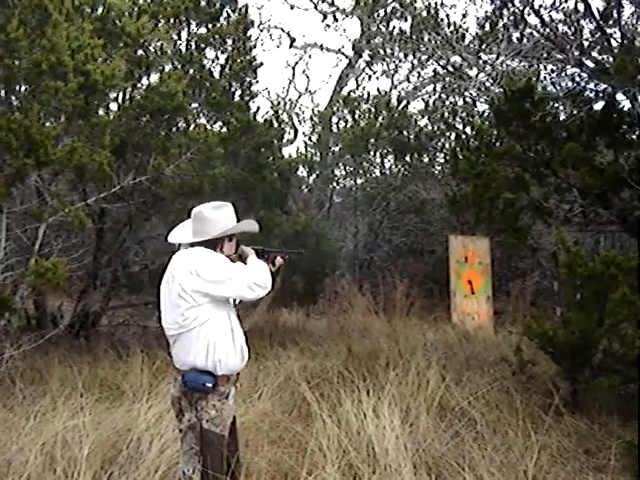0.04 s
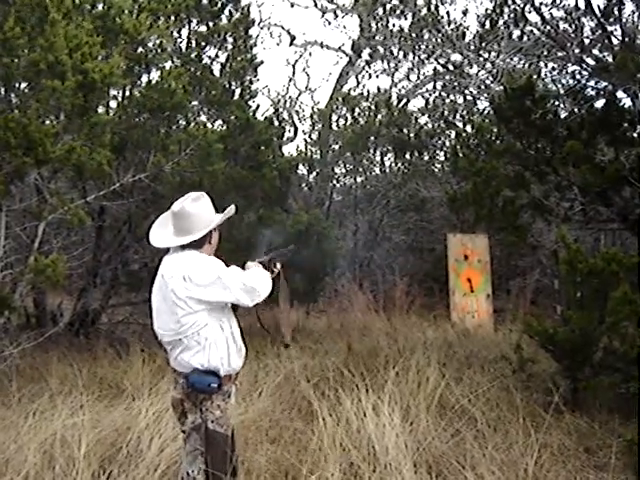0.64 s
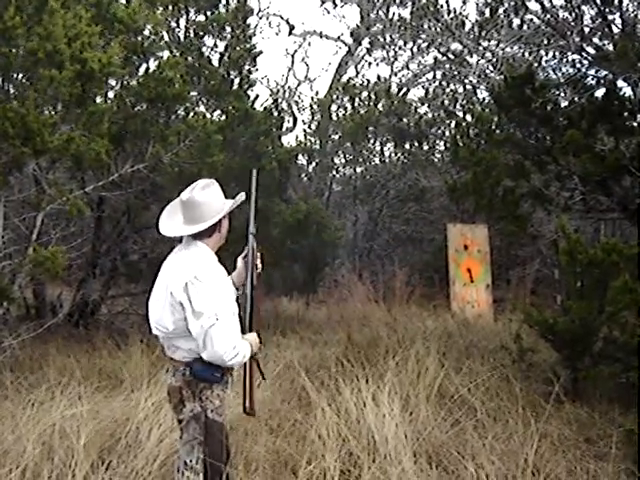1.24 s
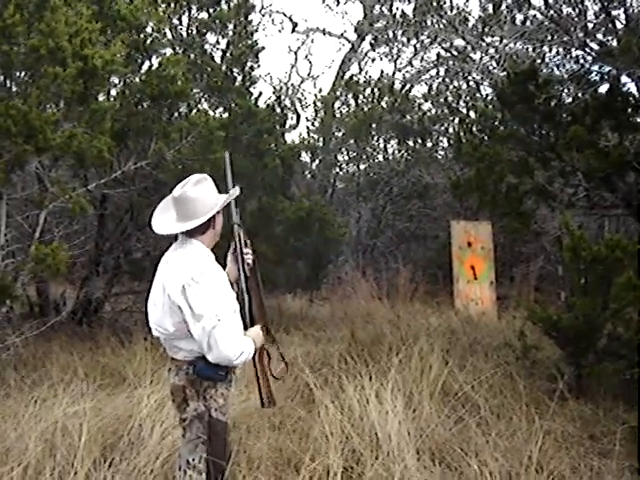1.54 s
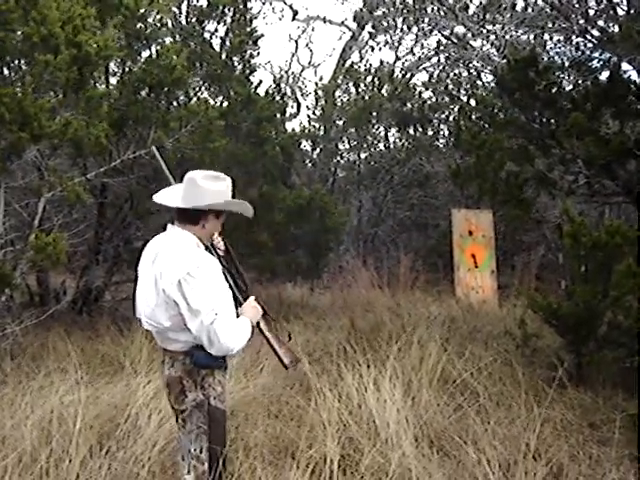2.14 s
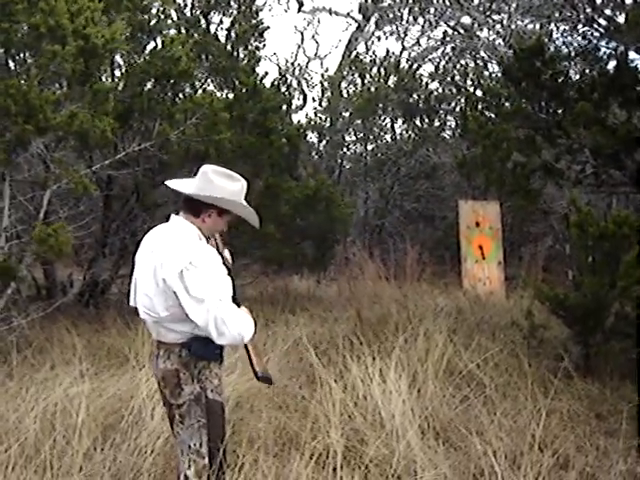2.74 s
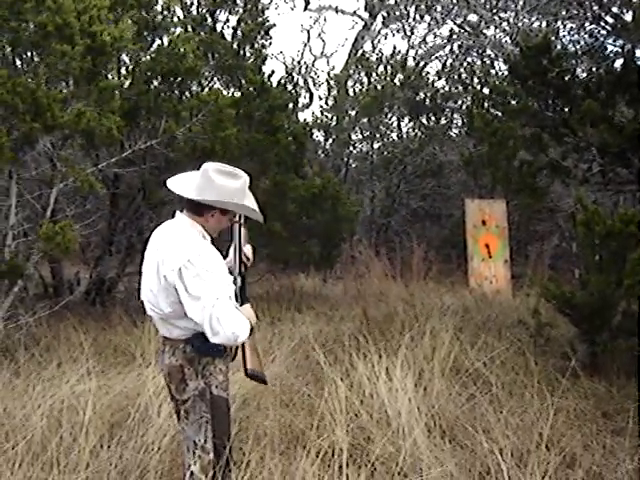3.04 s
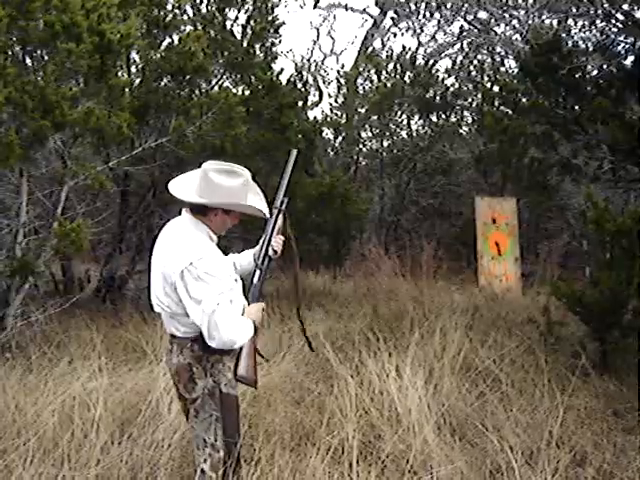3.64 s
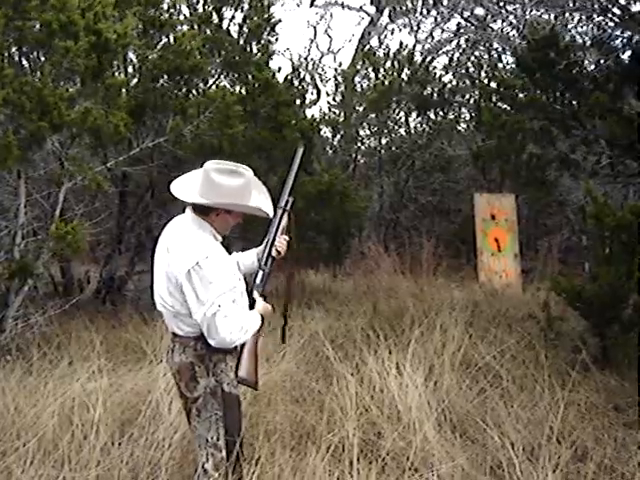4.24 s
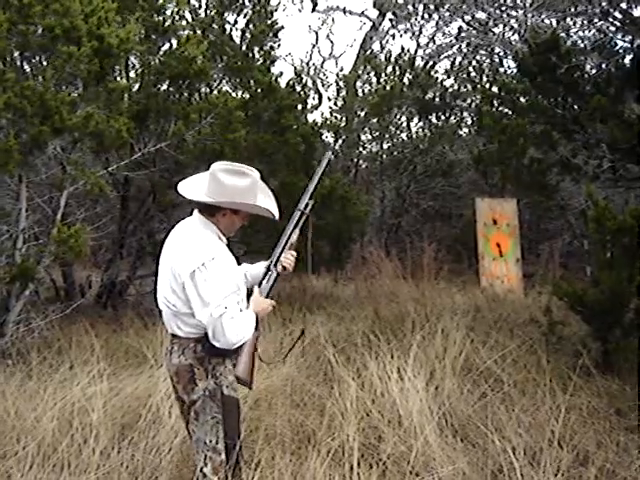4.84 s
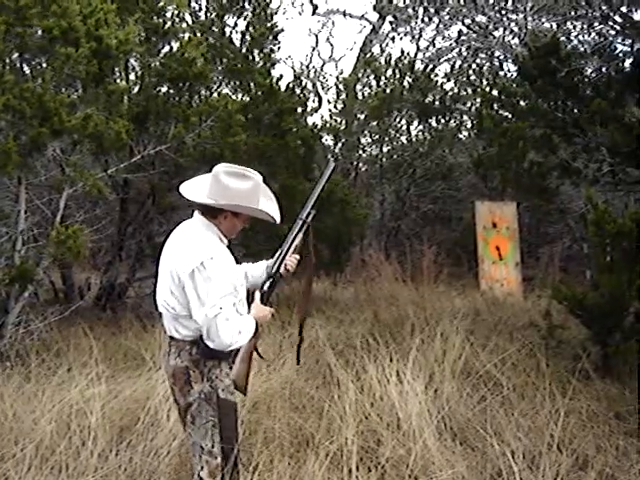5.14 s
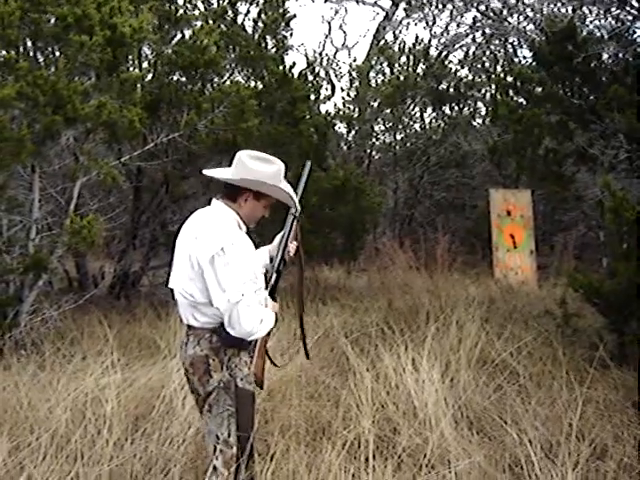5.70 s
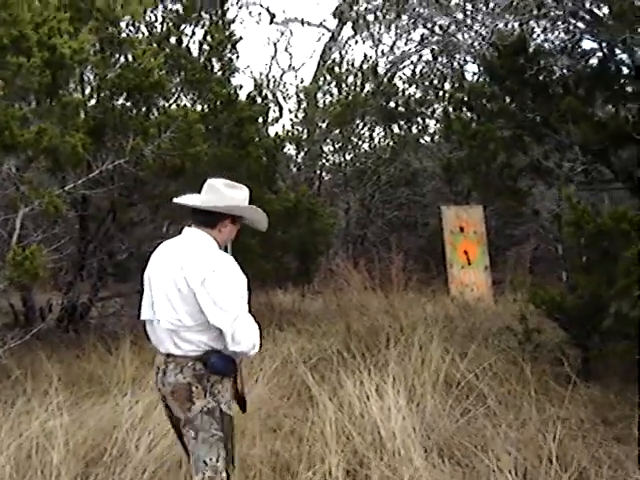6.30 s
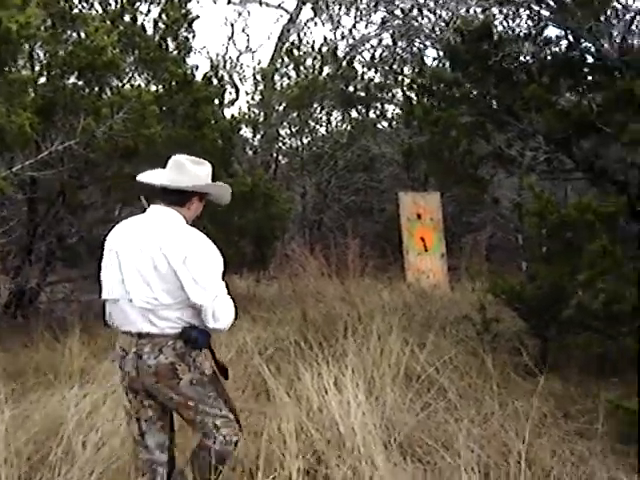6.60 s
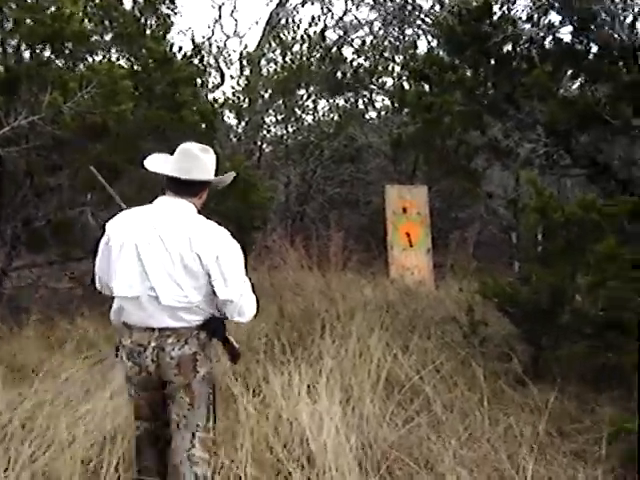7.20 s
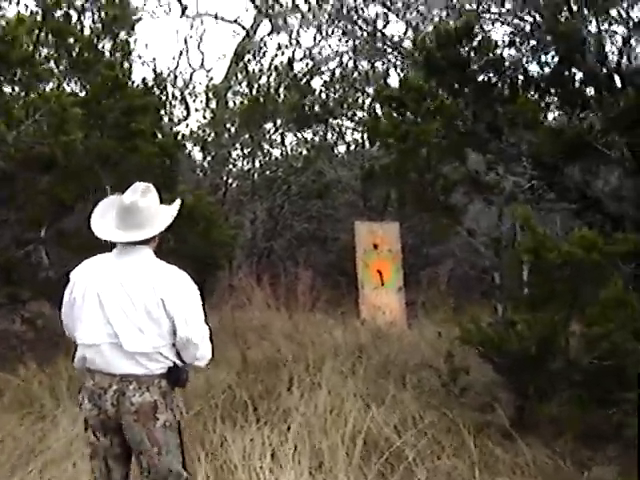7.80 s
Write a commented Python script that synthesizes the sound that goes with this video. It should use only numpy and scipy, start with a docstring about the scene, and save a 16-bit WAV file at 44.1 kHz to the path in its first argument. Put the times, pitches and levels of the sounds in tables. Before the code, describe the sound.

A shotgun fires once in a grassy clearing, its crack overloading a small microphone, slapping back off the trees and rolling into the distance. Light metal clicks and wooden knocks follow as the gun is handled. Then the pump is racked back and forward with two sharp, ringing clacks. Finally the shooter walks off through tall dry grass, swishing softly over a faint breeze and hiss.

```python
"""A grassy clearing in a light breeze, the tail of an earlier shot still dying away in the woods.
A shotgun fires: the crack of muzzle gas overloads a small microphone, slaps back off the trees and
rolls into the distance, while pellets smack a target board. The shooter handles the gun, then racks
the pump back and forward, steel clacking and ringing over the knock of the wooden stock.
Last, the shooter wades off through tall dry grass, blades swishing and cloth brushing."""
import sys
import numpy as np
from scipy import signal
from scipy.fft import rfft, irfft
from scipy.io import wavfile
from scipy.ndimage import uniform_filter1d

SR = 44100
rng = np.random.default_rng(int(sys.argv[2]) if len(sys.argv) > 2 else 0)


def inscribe(sig):
    """Save sig as 16-bit PCM at rate SR to the path in sys.argv[1].

    A 1-D sig is mono; a 2-D sig holds one channel per row.
    Samples are clipped to [-1, 1] before scaling.
    """
    pcm = np.round(np.clip(np.atleast_2d(sig).T, -1, 1) * 32767)
    wavfile.write(sys.argv[1], SR, pcm.astype(np.int16))


N = 346626
T = np.arange(N) / SR
EARLIER_SHOT_S, SHOT_S = -0.71, .276
TOP_HZ = 10150  # the treble rolls off above this
SCRAPE_S = .01  # gun parts scrape this long before they meet

# tone of the muzzle crack: (frequency [Hz], level [dB])
BLAST_EQ = [(25, -11), (60, -3.5), (130, 2), (400, -4.5), (1400, -3), (3000, -7), (6000, -11.5),
            (10000, -15)]
# slapbacks off clumps of trees: (time [s], level [dB])
SLAPBACKS = [(0.3108, -12.5), (0.3403, -16), (.358, -18), (.376, -18.5), (.41, -26), (.625, -34.5),
             (.853, -42.5), (1.003, -44), (1.265, -62), (1.58, -57.5)]
# tone of the near trees, the far trees and the distant roll: (frequency [Hz], level [dB])
NEAR_TREES_EQ = [(30, -19), (90, -4.5), (200, -2), (400, -5), (700, 6), (1000, -7.5), (1600, 2), (3000, -1),
                 (6000, -4), (10000, -10)]
FAR_TREES_EQ = [(40, -24), (200, -25), (400, -11.5), (600, 2), (760, 3), (950, -4), (1400, 0), (2400, -7),
                (4500, -14), (10000, -32)]
ROLL_EQ = [(60, -25.5), (300, -25.5), (470, -7), (640, 1), (760, -5.5), (950, -14.5), (1500, -18),
           (3000, -29), (10000, -61)]
# reverb time of the near and far trees: (frequency [Hz], t60 [s])
NEAR_DECAY = [(60, 0.32), (130, 0.69), (250, 0.3), (700, 0.9), (2000, 0.53), (5000, 0.42), (10000, 0.46)]
FAR_DECAY = [(100, 2.34), (600, 1.72), (1400, 1.43), (3000, 1.21), (9000, 1.05)]
# metal hits of handling, pump back (4.8 s), pump home (5.1 s) and carrying the gun off:
# (time [s], level [dB], wooden knock relative to the hit [dB], pitch of the struck part [Hz])
GUN_HITS = [(0.704, -32.5, -17, 2600), (0.7228, -30, -3, 2180), (.729, -27, -11, 2150),
            (0.7326, -25, -7.5, 2290), (1.075, -47.5, -10, 2400), (2.234, -43, -10, 4420),
            (2.245, -43.5, -17, 4440), (2.2928, -43.5, -9, 1830), (2.317, -51, -3, 2300),
            (2.7533, -52, -3, 2500), (3.29, -31.5, -23, 2810), (3.305, -40.5, -7.5, 1790),
            (3.332, -43, -10.5, 3650), (3.5563, -42, -7.5, 2670), (3.605, -49, -6, 1830),
            (3.7839, -30.5, -14, 2420), (4.0758, -40.5, -5.5, 2300), (4.8307, -25, -21, 2580),
            (4.848, -28, -11, 2400), (4.8642, -24, -10, 5940), (4.876, -24.5, -19, 4730),
            (4.8807, -17, -14.5, 4800), (4.894, -25, -12, 4530), (4.9077, -18.5, -30, 4020),
            (4.917, -24.5, -2.5, 4800), (4.922, -17, -12, 4730), (4.9374, -15, -10, 7560),
            (4.945, -11, -20, 2280), (5.117, -35, -11, 2630), (5.142, -35.5, -5.5, 9000),
            (5.171, -28, -18, 4200), (5.1742, -23, -14, 8350), (5.197, -32, -11, 3500),
            (5.2084, -16.5, -10, 3260), (5.2165, -21, -13, 5300), (5.2388, -17.5, -11.5, 3100),
            (5.2493, -13, -14, 6100), (5.254, -14, -13.5, 6260), (6.362, -42.5, -8, 4465),
            (6.375, -41.5, -16, 5630)]
# pump strokes: (start [s], stop [s], opening chatter [dB], closing chatter [dB], end thump [dB])
PUMP_STROKES = [(4.829, 4.937, -43, -25, -41), (5.115, 5.248, -46, -35.5, -40.5)]
# ring of the steel receiver and barrel: (frequency [Hz], level [dB], t60 [s])
STEEL_RING = [(1970, -13, 0.2), (2320, 5, 0.14), (2300, -23, .03), (2790, 3, .04), (3400, -10, .15),
              (4300, -4, 0.02), (3830, 0, .035), (4450, -2, .04), (5280, -22, 0.016), (6260, -12, .05),
              (5800, -18, 0.027), (8300, -5, 0.03), (7860, -20.5, .07), (8550, -7, 0.041)]
# tone of a steel clack and of a knock in the wooden stock: (frequency [Hz], level [dB])
CLACK_EQ = [(100, -29), (600, -20.5), (1050, -14), (1600, -8.5), (1900, -2), (2400, 2.5), (3100, -2),
            (4200, 2), (5600, -2.5), (7000, -5), (8300, -1), (10000, -4.5)]
STOCK_EQ = [(30, -11), (100, -9), (180, -10), (320, -0.5), (420, -6), (560, 11), (760, 7), (900, 1),
            (1030, 8.5), (1500, 8.5), (4000, -8.5)]
# a limb sweeps past grass and cloth: (start [s], swell [s], hold [s], swish [dB], brush [dB])
LIMB_SWEEPS = [(2.773, .1, 0.075, -72.5, -56.5), (5.434, 0.31, 0.23, -56.5, -59.5),
               (5.979, 0.57, 0.18, -52.5, -59.5), (6.561, 0.32, 0.18, -41.5, -50.5),
               (7.084, .16, 0.28, -45, -53), (7.507, 0.047, 0.18, -39.5, -47.5),
               (7.733, 0.04, 0.091, -41.5, -51.5)]
# a boot crushes stems: (time [s], level [dB])
FOOTSTEPS = [(6.571, -50.5), (6.7, -50), (7.34, -51), (7.65, -46)]
# tone of swishing blades and of brushing cloth and stems: (frequency [Hz], level [dB])
SWISH_EQ = [(300, -22.5), (1200, -7), (1550, -5), (1900, -9), (2400, 0), (3300, 0), (4500, 0), (5400, 2),
            (7000, 0.5), (8500, 2), (10000, 0.5)]
BRUSH_EQ = [(60, -12.5), (180, -6), (330, -1.5), (510, 1), (800, 1.5), (1500, -4), (1900, -6), (3000, -10),
            (9000, -44)]
# gusts in the trees: (peak time [s], level [dB], half length [s])
TREE_GUSTS = [(2.9, -64.5, 0.58), (4.5, -60.5, 0.77), (6.8, -65.5, 1.5)]
# soft bumps of air on the microphone: (time [s], level [dB])
WIND_BUMPS = [(2.242, -61), (3.621, -59), (3.809, -54), (5.786, -57), (6.14, -57), (6.289, -51),
              (6.394, -49.5), (7.817, -59)]
# tone of stirring leaves and of the steady hiss: (frequency [Hz], level [dB])
LEAVES_EQ = [(30, -6), (90, -2), (250, 0), (550, -2), (1200, -6), (2500, -14.5), (8000, -21)]
HISS_EQ = [(18, -38), (30, -5.5), (255, -6), (515, -3.5), (901, -8.5), (1300, -5), (1540, -11),
           (1660, -9.5), (2760, -10.5), (10000, -11), (13000, -47.5), (22000, -120)]


def shotgun(trees_s=.291, pellets_s=.436):
    """The blast, then the answer of the woods, the smack of pellets on the board and the long roll."""
    out = np.zeros(N)
    add(out, SHOT_S, muzzle_blast())
    add(out, trees_s, undb(-14.5) * tree_reverb(NEAR_TREES_EQ, NEAR_DECAY, rise_s=.0031, patchy_db=2.5))
    add(out, trees_s, undb(-22.5) * tree_reverb(FAR_TREES_EQ, FAR_DECAY, rise_s=.022, patchy_db=1.5))
    out += slapbacks()
    add(out, pellets_s, undb(-25) * puff(.014, low_hz=520, high_hz=3700))
    both_tails = np.hypot(roll_envelope(EARLIER_SHOT_S), roll_envelope(SHOT_S))
    return out + colour(noise(), ROLL_EQ) * both_tails * undb(.99 * drift(25.83))


def muzzle_blast(hold_s=.0089, release_s=.0017, boom_hz=48, boom_s=.0071):
    """A crack of gas gains weight as the pressure wave arrives, then swings into suction."""
    age = T[:SR // 2]
    gas = rng.standard_normal(len(age)) * np.exp(-np.maximum(age - hold_s, 0) / release_s)
    weight = np.clip(age / hold_s, 0, 1) ** 2
    crack = undb(-14) * colour(gas, BLAST_EQ)
    body = undb(-4.5) * band(gas * weight, 41.5, 2000)
    boom = undb(-25) * np.sin(2 * np.pi * boom_hz * age) * pulse(age / boom_s)
    return crack + body + boom


def tree_reverb(eq, t60s, rise_s, patchy_db):
    """Countless echoes off trunks and branches; air and foliage soak up each band at its own rate."""
    age = T[:3 * SR]
    echoes = colour(noise() * undb(patchy_db * drift(160)), eq)
    spectrum = rfft(echoes[:len(age)])
    hz = np.arange(len(spectrum)) * SR / len(age)
    centres = np.geomspace(50, TOP_HZ, 14)
    out = 0
    for centre, share in zip(centres, np.eye(len(centres))):
        one_band = irfft(spectrum * at_hz(np.c_[centres, share], hz))
        out = out + one_band * decay(age, at_hz(t60s, centre))
    return out * (1 - np.exp(-age / rise_s))


def slapbacks():
    """Clumps of trees throw the blast back; the longer the path, the duller and more smeared the slap."""
    out = np.zeros(N)
    for s, db in SLAPBACKS:
        delay_s = s - SHOT_S
        path = delay_s / .1  # 1 for an echo 0.1 s late
        low_hz = 121.2 if delay_s < .073 else 474  # soft ground drains the bass from later echoes
        high_hz = max(1640 / path ** .39, low_hz * np.sqrt(2))
        add(out, s, undb(db) * puff(.0054 * path ** .35, low_hz, high_hz))
    return out


def roll_envelope(shot_s, rise_s=.35, farthest_s=1.55, sag_db_per_s=9, fade_db_per_s=30):
    """Distant echoes build, sag slowly, then fade faster once the farthest woods have answered."""
    age = np.maximum(T - shot_s, 0)
    db = -48 - sag_db_per_s * age - fade_db_per_s * np.maximum(age - farthest_s, 0)
    return undb(db) * np.minimum(age / rise_s, 1)


def gun_action(echo_delay_s=.033):
    """Each hit rings the steel and knocks the stock; the pump thumps home; the trees answer faintly."""
    clacks, knocks, rings, thumps = np.zeros((4, N))
    age = T[:SR // 2]
    mode_hz, mode_db, mode_t60 = np.transpose(STEEL_RING)[:, :, None]
    modes = undb(mode_db) * np.sin(2 * np.pi * mode_hz * age) * decay(age, mode_t60)
    trees = band(rng.standard_normal(len(age)), 400, 5500, order=1) * decay(age, t60=.5)
    for _, stop, _, _, db in PUMP_STROKES:
        add(thumps, stop, undb(db) * pulse(age / .00088))
    for s, db, wood_db, part_hz in GUN_HITS + pump_chatter() + handling_ticks():
        add(clacks, s - SCRAPE_S, steel_clack(db, part_hz))
        add(knocks, s, undb(db + wood_db) * rng.standard_normal(len(age)) * decay(age, t60=.04))
        mode_mix = rng.uniform(-1.1, 1, len(modes))  # each point of impact favours other modes
        add(rings, s, undb(db - 25) * (mode_mix @ modes))
    gun = undb(1.56) * colour(clacks, CLACK_EQ) + colour(knocks, STOCK_EQ) + rings + thumps
    echo = signal.oaconvolve(gun, trees / np.linalg.norm(trees))[:N]
    add(gun, echo_delay_s, undb(-27.3) * echo)
    return gun


def steel_clack(db, part_hz, firm_db=-25, ping_width_hz=640, db_per_octave=14.5):
    """Parts scrape, meet and rattle, pinging briefly at their own pitch; harder hits are brighter."""
    age = T[:SR // 8] - SCRAPE_S
    scrape = undb(-6) * np.exp(-np.abs(age) / .0016)
    envelope = np.where(age < 0, scrape, decay(np.abs(age), t60=.021))
    rattle = rng.standard_normal(len(age)) * envelope
    ping = signal.lfilter(*signal.iirpeak(part_hz, part_hz / ping_width_hz, fs=SR), rattle)
    ping *= np.linalg.norm(rattle) / np.linalg.norm(ping)
    force_db = db - firm_db
    rattle_gain = undb(-.05 * min(force_db, 0))  # gentle touches get a shade more rattle
    high_hz = 10100 * 2 ** (force_db / db_per_octave)
    return undb(db) * band(rattle_gain * rattle + undb(-12) * ping, 80, high_hz, order=1)


def pump_chatter(hits_per_s=150, scatter_db=3, wood_db=-7, low_hz=2200, high_hz=7000):
    """The sliding pump chatters louder along each stroke; gives rows like GUN_HITS."""
    hits = []
    for start, stop, first_db, last_db, _ in PUMP_STROKES:
        count = int((stop - start) * hits_per_s)
        for k, (late, force, pitch) in enumerate(rng.random((count, 3))):
            travel = (k + late) / count
            db = first_db + (last_db - first_db) * travel + scatter_db * (2 * force - 1)
            part_hz = low_hz * (high_hz / low_hz) ** pitch
            hits.append((start + travel * (stop - start), db, wood_db, part_hz))
    return hits


def handling_ticks(start_s=.96, stop_s=3.1, count=5, db=-56.5, wood_db=-7):
    """Sling and fingers tick faintly on the gun; gives rows like GUN_HITS."""
    return [(rng.uniform(start_s, stop_s), db, wood_db, rng.uniform(2200, 3300)) for _ in range(count)]


def grass_wading(release_s=.045, step_s=.04, grain_db=2.5):
    """Dry blades tick against the legs in dense swarms; cloth and trodden stems brush underneath."""
    swish_power, brush_power = np.zeros((2, N))
    for start, swell, hold, swish_db, brush_db in LIMB_SWEEPS:
        age = T - start
        speed = np.clip(age / swell, 0, 1) * np.exp(-np.maximum(age - swell - hold, 0) / release_s)
        swish_power += (undb(swish_db) * speed) ** 2
        brush_power += undb(brush_db) ** 2 * speed
    for s, db in FOOTSTEPS:
        brush_power += (undb(db) * pulse(np.maximum(T - s, 0) / step_s)) ** 2
    ticks = unit(noise() * undb(grain_db * np.minimum(rng.exponential(size=N), 6)))
    swish = colour(ticks, SWISH_EQ) * np.sqrt(swish_power) * undb(.52 + .9 * drift(45))
    brush = colour(noise(), BRUSH_EQ) * np.sqrt(brush_power) * undb(-.15 + 1.4 * drift(30))
    return swish + brush


def breeze(calm_db=-70.5, hiss_db=-62):
    """Gusts stir the leaves and buffet the microphone over a bed of steady hiss."""
    gust_power = sum(undb(db) ** 2 * np.exp(-((T - s) / half) ** 2) for s, db, half in TREE_GUSTS)
    wind = np.sqrt(undb(calm_db) ** 2 + gust_power)
    leaves = colour(noise(), LEAVES_EQ) * wind * undb(2 * drift(7.2))
    hiss = undb(hiss_db) * colour(noise(), HISS_EQ)
    rumble = unit(band(noise(), 30.14, 95.4)) * wind * undb(-13 + 3.3 * drift(13))
    for s, db in WIND_BUMPS:
        add(rumble, s, undb(db) * puff(.018, low_hz=42, high_hz=95))
    return leaves + hiss + rumble


def puff(length_s, low_hz, high_hz):
    """A band of noise that swells quickly and fades."""
    age = T[:16384] / length_s
    burst = unit(band(rng.standard_normal(len(age)), low_hz, high_hz))
    return burst * np.sqrt(2 * age) * np.exp(1 / 2 - age)


def pulse(age):
    """An envelope that peaks at 1 when age is 1, then dies away."""
    return age * np.exp(1 - age)


def decay(age, t60):
    """An envelope that falls 60 dB in t60 seconds."""
    return np.exp(-np.log(1000) * age / t60)


def colour(x, eq, size=4096):
    """Minimum-phase EQ, rolled off above TOP_HZ; white noise keeps its power."""
    hz = np.arange(size // 2 + 1) * SR / size
    gain = undb(at_hz(eq, hz)) / np.sqrt(1 + (hz / TOP_HZ) ** 20)
    cepstrum = irfft(np.log(unit(gain)))
    cepstrum[1:size // 2] *= 2
    cepstrum[size // 2 + 1:] = 0
    impulse = irfft(np.exp(rfft(cepstrum)))
    return signal.oaconvolve(x, impulse)[:len(x)]


def band(x, low_hz, high_hz, order=2):
    """Band-pass."""
    edges = [low_hz, min(high_hz, SR / 2 - 1)]
    return signal.sosfilt(signal.butter(order, edges, "band", fs=SR, output="sos"), x)


def at_hz(points, hz):
    """Read (frequency [Hz], value) points on a log-frequency axis."""
    point_hz, value = np.transpose(points)
    return np.interp(np.log(np.maximum(hz, 1)), np.log(point_hz), value)


def drift(rate_hz):
    """Smooth random modulation with rms 1."""
    hold = int(SR / rate_hz)
    steps = np.repeat(rng.standard_normal(N // hold + 1), hold)
    return unit(uniform_filter1d(uniform_filter1d(steps, hold), hold)[:N])


def noise():
    """White noise."""
    return rng.standard_normal(N)


def undb(db):
    """Decibels to gain."""
    return 10 ** (np.asarray(db) / 20)


def unit(x):
    """Scale to rms 1."""
    return x / np.sqrt(np.mean(x ** 2))


def add(out, s, x):
    """Mix x in at time s."""
    i = int(s * SR)
    out[i:i + len(x)] += x[:N - i]


def scene():
    """The mono mix at the microphone."""
    return (shotgun() + grass_wading() + breeze() + gun_action())[None]


def record(dry, low_cut_hz=36):
    """The microphone soft-clips the loudest peaks; the camera trims the deep bass and the top."""
    low_cut = signal.butter(2, low_cut_hz, "high", fs=SR, output="sos")
    high_cut = signal.ellip(12, .2, 70, TOP_HZ, fs=SR, output="sos")
    return signal.sosfilt(high_cut, signal.sosfilt(low_cut, np.tanh(dry)))


dry = scene()
out = record(dry)
inscribe(out)
```